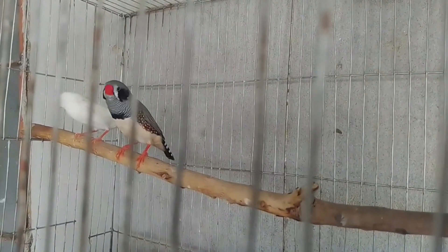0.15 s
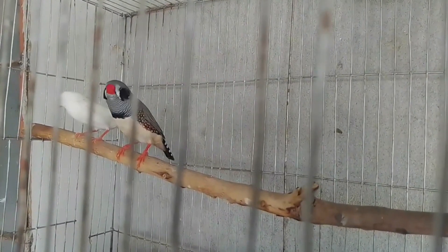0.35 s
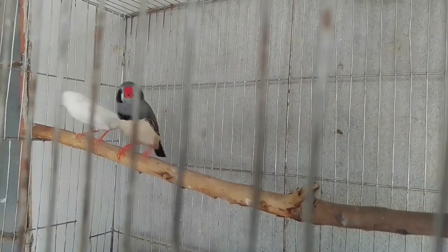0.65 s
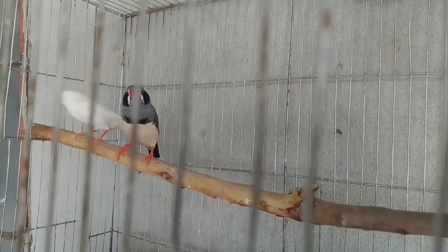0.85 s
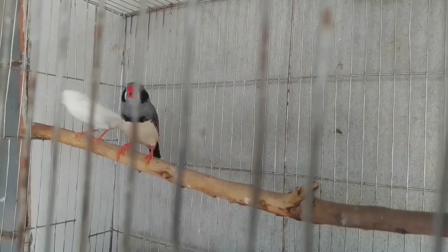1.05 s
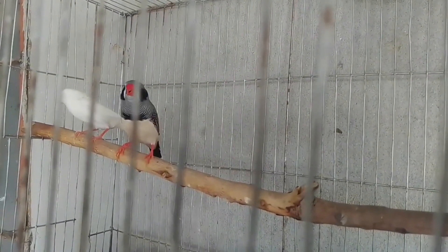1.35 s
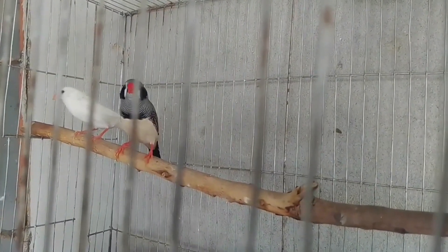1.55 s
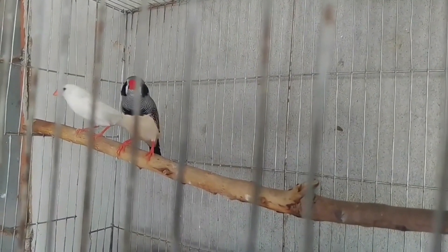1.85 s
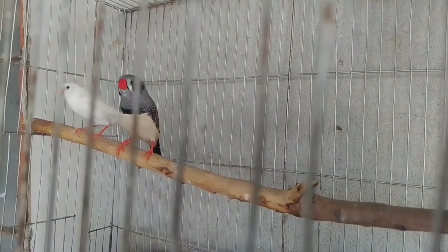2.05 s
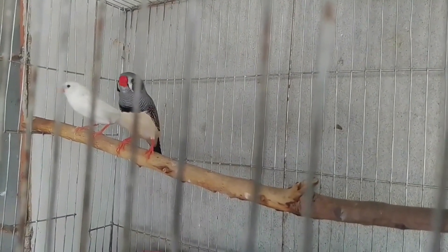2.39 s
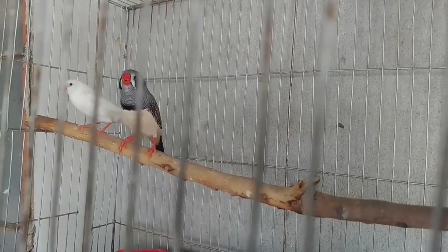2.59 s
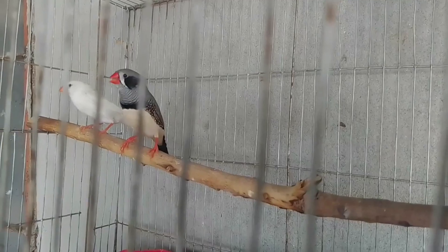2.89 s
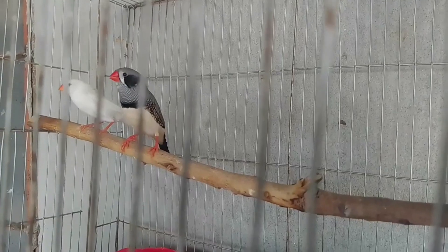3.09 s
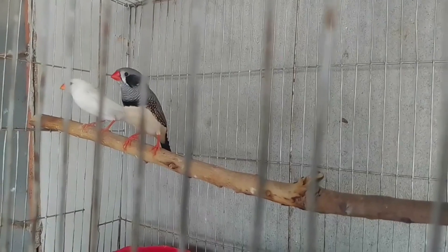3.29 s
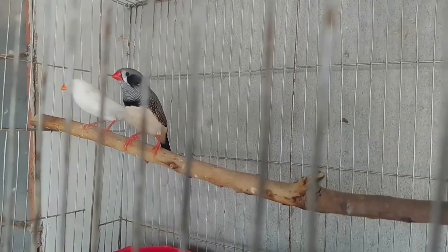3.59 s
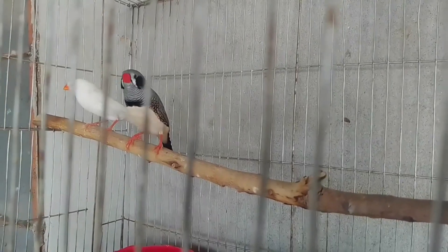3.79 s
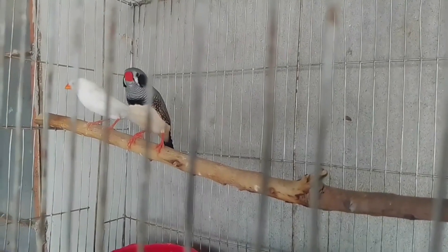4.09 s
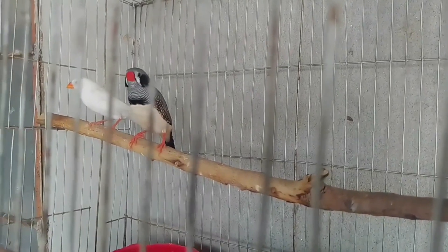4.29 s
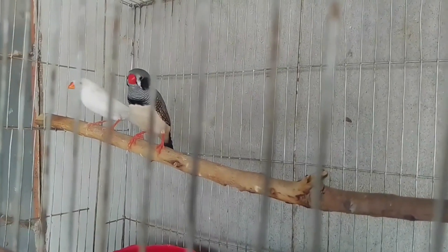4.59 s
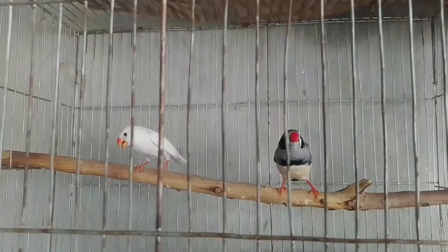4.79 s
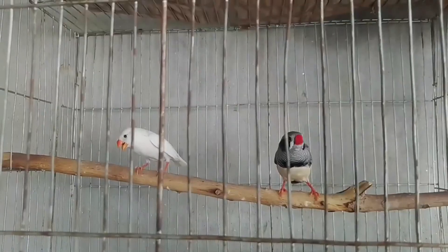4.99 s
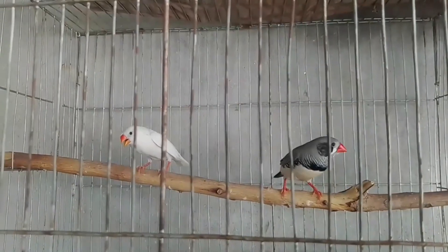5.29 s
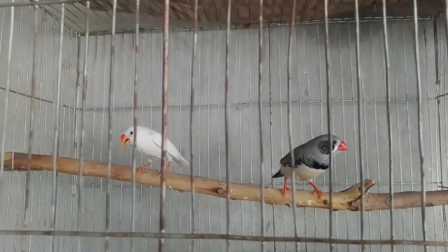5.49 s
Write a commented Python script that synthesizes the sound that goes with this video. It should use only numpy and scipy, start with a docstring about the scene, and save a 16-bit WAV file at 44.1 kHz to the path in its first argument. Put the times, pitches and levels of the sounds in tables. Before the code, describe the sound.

A male finch sings close by in an indoor cage, over a soft room murmur and hiss with slight echo. His quick, high, raspy phrase lasts under half a second and comes five times, at about 0, 0.8, 1.5, 2.2 and 3 seconds. Short calls fall at 0.7 and 2.2 seconds, and longer, louder nasal ones at 1.3 and 2.8. Another small bird warbles briefly around 0.7 and 2.1 seconds. Short wing rustles come at about 1.6, 2.4, 2.6 and 3 seconds. The song ends near 3.4 seconds, and faint distant birds call around 4 seconds, followed by more light rustling near 4.6. At about 4.75 seconds the sound cuts out for an instant, returning at 4.9 with louder, fuller room noise. The other bird gives a quick run of raspy chirps from 5.1 to 5.3 seconds.

```python
"""Zebra finch in a cage

A male sings his motif five times indoors, with calls between: syrinx harmonics coloured by throat,
beak and microphone. Another small bird warbles, wings rustle and far birds call over the room's
murmur. The sound drops out once and comes back with a louder room."""
import sys
import numpy as np
from scipy import signal
from scipy.fft import rfft, irfft, next_fast_len
from scipy.io import wavfile
from scipy.ndimage import uniform_filter1d, map_coordinates

SR = 44100
rng = np.random.default_rng(int(sys.argv[2]) if len(sys.argv) > 2 else 0)


def store_wav(level_fs):
    """Save 16-bit WAV to argv[1]."""
    pcm = np.round(np.clip(np.atleast_2d(level_fs), -1, 1) * 32767)
    wavfile.write(sys.argv[1], SR, pcm.T.astype(np.int16))


N = 249165
TOP_HZ = 15750
DROPOUT_START_S, DROPOUT_END_S = 4.7425, 4.9105


def amp(db):
    """Gain of a dB value."""
    return 10 ** (np.asarray(db) / 20)


def unit_rms(x):
    """x scaled to rms 1."""
    return x / np.sqrt(np.mean(np.abs(x) ** 2) + 1e-20)


def curve_at(points, hz):
    """Interpolates (Hz, value) points on a log frequency axis."""
    point_hz, values = np.transpose(points)
    return np.interp(np.log(hz + 1), np.log(point_hz + 1), values)


def wobble(n, rate_hz):
    """Smooth random curve of n samples, rate_hz knots a second."""
    knots = rng.standard_normal(int(n / SR * 2000) + 4)
    return map_coordinates(knots, [np.arange(n) * min(rate_hz, 2000) / SR])


def blur(n, rate_hz):
    """Complex wobble; spreads a tone into a noise band."""
    return wobble(n, rate_hz) + 1j * wobble(n, rate_hz)


def filtered(x, response):
    """x through a gain given as a function of Hz."""
    size = next_fast_len(len(x) + 8192)
    return irfft(rfft(x, size) * response(np.fft.rfftfreq(size, 1 / SR)), size)[:len(x)]


def patchy_noise(spectrum, patchy_db):
    """Coloured noise of rms 1 with patches of random gain in time and frequency."""
    bins = signal.stft(rng.standard_normal(N), nperseg=512)[2]
    patches = uniform_filter1d(uniform_filter1d(rng.standard_normal(bins.shape), 6, 0), 10, 1)
    noise = signal.istft(bins * amp(patchy_db * unit_rms(patches)), nperseg=512)[1][:N]
    return unit_rms(filtered(noise, lambda hz: amp(curve_at(spectrum, hz))))


def add(track, start_s, sound):
    """Mixes sound into track at start_s."""
    part = track[round(start_s * SR):][:len(sound)]
    part += sound[:len(part)]


# Room noise before the dropout. Each row: time in seconds, murmur and hiss in relative dB.
ROOM_LEVELS = [(0, -53, -58.5), (1.3, -51.5, -47.5), (2.1, -54.5, -54.5), (2.8, -49, -54),
               (3.5, -52.5, -57.5), (4.7, -51, -58.5)]
# Room noise spectra. Each row: frequency in Hz, relative density in dB.
MURMUR_SPECTRUM = [(28, -70.5), (62, -11.5), (270, -1), (500, -7), (1700, -13), (2700, -10), (4000, -22.5),
                   (16000, -66)]
HISS_SPECTRUM = [(2000, -12), (5000, -11), (7500, -11.5), (9600, -3.5), (11500, -13.5), (16000, -29)]
LOUD_ROOM_SPECTRUM = [(30, -34), (109, 0), (190, -12.5), (335, -3), (500, -12), (1300, -8), (3270, -9),
                      (5130, -15), (7400, -13), (9500, -4.5), (12000, -22), (16000, -35)]


def room_noise():
    """Murmur and hiss; after the dropout the noise surges and settles, louder and fuller."""
    t = np.arange(N) / SR
    times_s, murmur_db, hiss_db = np.transpose(ROOM_LEVELS)
    murmur = amp(np.interp(t, times_s, murmur_db) - 2.3) * patchy_noise(MURMUR_SPECTRUM, patchy_db=1.5)
    hiss = amp(np.interp(t, times_s, hiss_db) + 2.5) * patchy_noise(HISS_SPECTRUM, patchy_db=2)
    surge_db = 5 * np.exp(-np.abs(t - DROPOUT_END_S) / 0.0193)
    loud_room = amp(-41.5 + surge_db) * patchy_noise(LOUD_ROOM_SPECTRUM, patchy_db=1.1)
    return np.where(t < DROPOUT_END_S, murmur + hiss, loud_room)


# Voice colour: throat and microphone together, with a bright peak near 9.6 kHz.
# Each row: frequency in Hz, gain in dB.
VOICE_COLOUR = [(950, -27.5), (1450, -15.5), (2100, -18.5), (2750, 2), (3600, -1), (5700, 1), (6400, -9),
                (7300, -10), (9600, -3.5), (11500, -22), (13500, -30.5), (16000, -42)]


def syllable(gesture, pitch_ratio, beak_path_hz, treble_db, throb_db, beak_db, tilt_db_per_khz=0,
             strong_every=1, strong_shift=0, weak_db=0, shut_db=0, hiss=0.058):
    """Syrinx harmonics with voice colour and a moving beak resonance; roughness blurs each to noise."""
    times_s, *columns = np.transpose(gesture)
    length_s = times_s[-1]
    t = np.arange(times_s[0], length_s, 1 / SR)
    n = len(t)
    pitch_hz, db, roughness = [np.interp(t, times_s, column) for column in columns]
    pitch_hz = pitch_hz * pitch_ratio * (1 + 0.0046 * wobble(n, 125.4))
    harmonics = np.arange(1, 31)[:, None]
    hz = harmonics * pitch_hz
    weak = (harmonics + strong_shift) % strong_every > 0

    beak_hz = np.interp(t, np.linspace(0, length_s, len(beak_path_hz)), beak_path_hz)
    shape_db = curve_at(VOICE_COLOUR, hz) + beak_db / (1 + ((hz - beak_hz) / 700) ** 2)
    shape_db += weak_db * weak
    # A closed beak narrows the sound around its lowest resonance; opening lets the upper partials in.
    shape_db += tilt_db_per_khz * np.minimum(np.abs(hz / 1000 - 2.7), 3.5)
    shape_db += shut_db * np.exp(-(t / 0.013) ** 2) * np.clip((hz - 4300) / 1400, 0, 1)
    gain = amp(shape_db) * (hz < TOP_HZ)
    gain /= np.sqrt(np.sum(gain ** 2 * (hz < 7000), 0) / 2)
    lift_db = treble_db + 0.7 * (-25 - db)  # the treble holds up as the level falls
    gain *= amp(lift_db * np.clip((hz - 6500) / 1000, 0, 1))

    # Uneven cycles blur the high partials first; weak partials are raspier.
    noise_share = roughness * (1 + (hz / 6000) ** 2) + hiss * (hz > 6800)
    noise_share = np.clip(noise_share + 0.55 * weak, 0, 1)
    rasp = np.array([blur(n, 900) for _ in harmonics]) / np.sqrt(2)
    swell = amp(2.5 * np.array([wobble(n, 76) for _ in harmonics]))
    phase = 2 * np.pi * harmonics * np.cumsum(pitch_hz) / SR + 0.3 * harmonics ** 2
    partials = (np.sqrt(1 - noise_share) * swell + np.sqrt(noise_share) * rasp) * np.exp(1j * phase)
    fades = np.minimum(t / 0.003, 1) * np.minimum((length_s - t) / 0.01, 1)
    return fades * amp(db + throb_db * wobble(n, 250)) * np.sum(gain * partials.imag, 0)


# Syrinx gestures. Each row: time in seconds, base pitch in Hz, base level in dB, roughness 0-1.
OPENER_GESTURE = [(0, 1430, -56, 0.1), (.007, 1526, -32.5, .05), (.016, 1467, -31.5, .15),
                  (.021, 890, -34, .4), (.028, 910, -30, 0.2), (.04, 787, -33, 0.5),
                  (.052, 730, -28.5, 0.2), (.068, 688, -49.5, 0.4)]
SLIDE_GESTURE = [(0, 715, -38.5, .6), (.012, 674.6, -25, 0.32), (.018, 652, -24.5, .22),
                 (.03, 591, -34, 0.22), (.054, 564, -33.5, .45)]
WHISTLE_GESTURE = [(0, 840.6, -47, .04), (.005, 774, -19, 0.09), (.019, 797, -16, .05),
                   (.027, 789, -17.5, 0.036), (.044, 754, -32, 0.036)]
RASP_GESTURE = [(0, 951, -46, .25), (.008, 1022, -18.5, 0.258), (.014, 1328, -26, .7),
                (.03, 1170, -19.5, 0.36), (.042, 916, -28.5, .7), (.082, 598, -45, 0.95)]
STACK_GESTURE = [(0, 568, -32, .5), (.01, 557, -41.5, .35), (.02, 555, -28.5, 0.05),
                 (.064, 540.7, -28.5, 0.021), (.076, 533, -26.5, .3), (.096, 553, -60, 0.45)]
# Motifs. Each row: start in seconds, spacing ratio, slide/rasp/stack gain in dB, slide/rasp pitch
# ratio, opener gain in dB and pitch ratio, whistle gain in dB and pitch ratio, stack pitch ratio,
# low pip's first and last pitch in Hz.
FINCH_MOTIFS = [(.005, .995, -0.55, 0.97, 2, 0.96, -4, 1.03, .988, 4650, 3800),
                (.759, 1.047, 0.4, 0.96, 0.3, 0.96, 2.5, 1, .994, 2530, 3360),
                (1.512, 1.001, 0.65, 0.95, 3.5, 0.97, 1.5, 1.022, 1.0001, 4400, 4100),
                (2.248, 1.05, 0.1, 0.96, -1.4, 1, -1.5, .99, 1.003, 2750, 3460),
                (3.016, 1.01, -1.1, 0.95, 4, 1, 0.2, 1.01, .992, 4560, 4166)]


def finch_motifs():
    """Each motif strings five syllables at its own tempo, strength and pitch."""
    out = np.zeros(N)
    for (start_s, spacing, db, ratio, opener_db, opener_ratio,
         whistle_db, whistle_ratio, stack_ratio, _, _) in FINCH_MOTIFS:
        opener = syllable(OPENER_GESTURE, opener_ratio, (3100, 4200, 3100), treble_db=-0.5,
                          throb_db=2.3, beak_db=-0.5, tilt_db_per_khz=-1.18, shut_db=-5)
        slide = syllable(SLIDE_GESTURE, ratio, (5000, 4600, 3250), treble_db=1.5, throb_db=1.3,
                         beak_db=-4, tilt_db_per_khz=-0.7, strong_every=2, strong_shift=1, weak_db=-14)
        whistle = syllable(WHISTLE_GESTURE, whistle_ratio, (6100, 6280, 6300), treble_db=10,
                           throb_db=1.9, beak_db=18.5, strong_every=4, weak_db=-18, hiss=0.37)
        rasp = syllable(RASP_GESTURE, ratio, (4400, 4600, 4000), treble_db=4.5,
                        throb_db=-1.2, beak_db=8, tilt_db_per_khz=0.5)
        stack = syllable(STACK_GESTURE, stack_ratio, (3500, 3100, 2900), treble_db=9,
                         throb_db=0.6, beak_db=5, tilt_db_per_khz=-6)
        add(out, start_s, amp(opener_db) * opener)
        add(out, start_s + spacing * 0.13, amp(db) * slide)
        add(out, start_s + spacing * 0.1993, amp(whistle_db) * whistle)
        add(out, start_s + spacing * 0.243, amp(db) * rasp)
        add(out, start_s + spacing * 0.311, amp(db) * stack)
    return out


def chirp(length_s, from_hz, to_hz, db):
    """A throbbing, raspy glide; its overtones are strongest near the treble resonance."""
    progress = np.arange(0, 1, 1 / (length_s * SR))
    n = len(progress)
    hz = (from_hz + (to_hz - from_hz) * progress) * (1 + 0.008 * wobble(n, 250))
    phase = 2 * np.pi * np.cumsum(hz) / SR
    throb_db = 2.4 * wobble(n, 300)
    tone = (1 + 0.32 * blur(n, 1100)) * np.exp(1j * phase)
    for k in (2, 3, 4):
        overtone_db = -24.5 + 11.8 * np.exp(-((k * hz - 9400) / 1200) ** 2) - 12 * (k * hz > 11000)
        tone += amp(overtone_db) * (0.2 + 1.2 * blur(n, 1100)) * np.exp(1j * k * phase)
    return amp(db + throb_db) * np.sqrt(2 * np.sin(np.pi * progress)) * tone.imag


def finch_pips():
    """A low and a high pip before each motif's slide."""
    out = np.zeros(N)
    for start_s, spacing, db, *_, from_hz, to_hz in FINCH_MOTIFS:
        add(out, start_s + spacing * 0.111, chirp(0.006, from_hz, to_hz, db - 31))
        add(out, start_s + spacing * 0.116, chirp(0.008, 5890, 5550, db - 32))
    return out


# Short notes. Each row: start and length in seconds, first and last pitch in Hz, level in dB.
RASPY_NOTES = [(0.61, .017, 2225, 2660, -39), (0.668, .02, 1880, 1875, -40),
               (0.699, 0.022, 3086, 2700, -31.5), (0.718, 0.021, 2736, 2856, -30),
               (0.745, 0.017, 2327, 2356, -30), (0.765, 0.019, 1900, 1986, -37),
               (1.61, 0.017, 4600, 4900, -39), (1.98, 0.044, 2620, 2332, -41),
               (2.032, 0.028, 3550, 3730, -45), (2.053, 0.023, 2345, 1955, -35),
               (2.082, 0.0415, 2950, 2890, -30.5), (2.119, 0.03, 2490, 2333, -30),
               (2.147, 0.034, 2133, 1876, -33.5), (5.104, 0.021, 2400, 2690, -43),
               (5.128, 0.0093, 3950, 3300, -33), (5.134, 0.04, 3210, 3350, -34.5),
               (5.184, 0.0058, 3900, 3440, -24.5), (5.187, 0.023, 3040, 2680, -26.5),
               (5.202, 0.017, 2764, 3340, -24), (5.219, 0.057, 3350, 3270, -35),
               (5.221, 0.025, 2513, 2630, -24.5), (5.249, 0.056, 2164, 2026, -41.5)]


def raspy_notes():
    """Short raspy notes: the other bird's runs, one lone high finch pip, and a low finch note that sounds with
    the first short call."""
    out = np.zeros(N)
    for start_s, *note in RASPY_NOTES:
        add(out, start_s, chirp(*note))
    return out


# Call gestures. Each row: time in seconds, base pitch in Hz, base level in dB, roughness 0-1.
SHORT_CALL_GESTURE = [(0, 738, -42, .2), (.007, 735, -26, .1), (.017, 635, -31.5, .15),
                      (.036, 586, -33, .3)]
LONG_CALL_GESTURE = [(0, 2021, -32, .1), (.006, 1893, -21.5, 0.27), (.013, 1617, -13.5, 0.12),
                     (.021, 1330, -25.5, .3), (.025, 1077, -16.5, 0.65), (.036, 890, -17.5, 0.07),
                     (.047, 920.5, -17, .03), (.07, 910, -17, 0.014), (.092, 926, -19, .03),
                     (.11, 967, -23.5, .04), (.135, 847.5, -15.5, 0.037), (.158, 820, -18.5, .2),
                     (.174, 740, -19, 0.62), (.195, 663, -45, 0.51)]
# Calls. Each row: start in seconds, gain in dB, pitch ratio.
SHORT_CALLS = [(0.661, -1, .995), (2.155, -4, 0.78)]
LONG_CALLS = [(1.268, -2.1, .995), (2.775, -1.63, 1.02)]


def finch_calls():
    """Falling calls between motifs; the long ones start with a shut beak."""
    out = np.zeros(N)
    for start_s, db, ratio in SHORT_CALLS:
        call = syllable(SHORT_CALL_GESTURE, ratio, (2900, 2800),
                        treble_db=1.5, throb_db=0.9, beak_db=6, tilt_db_per_khz=-3)
        add(out, start_s, amp(db) * call)
    for start_s, db, ratio in LONG_CALLS:
        call = syllable(LONG_CALL_GESTURE, ratio, (3500, 3430, 4900, 4387, 4020, 4200, 3400),
                        treble_db=6.5, throb_db=0.9, beak_db=8, shut_db=-29.5, hiss=0.07)
        add(out, start_s, amp(db) * call)
    return out


# Rustle spectrum as heard through the microphone. Each row: frequency in Hz, relative density in dB.
RUSTLE_SPECTRUM = [(900, -50.5), (2600, -17.5), (3300, -13), (5600, -6), (7300, -21), (9600, -6),
                   (12000, -24), (16000, -34.5)]
# Rustles. Each row: peak time and rise in seconds, level in dB, treble gain in dB.
WING_RUSTLES = [(1.622, 0.018, -27, -5.5), (2.424, 0.0088, -30.5, 7), (2.62, 0.012, -20, 5),
                (3.002, 0.016, -30, 1), (3.044, 0.014, -27, 0), (3.7, 0.031, -56, 11),
                (4.452, .04, -68, 24.5), (4.535, 0.0028, -53, 21.5), (4.595, 0.024, -29, -1.5),
                (4.723, 0.038, -49, 14.5)]


def wing_rustles():
    """Feathers brush air and wire: spiky noise under a quick swell."""
    t = np.arange(N) / SR
    spiky = patchy_noise(RUSTLE_SPECTRUM, patchy_db=4) * amp(0.83 * wobble(N, 700))
    treble = filtered(spiky, lambda hz: hz > 7300)
    out = np.zeros(N)
    for peak_s, rise_s, db, treble_db in WING_RUSTLES:
        rise = np.exp(-((t - peak_s) / rise_s) ** 2)
        fall = np.exp(-np.maximum(t - peak_s, 0) / (1.54 * rise_s))
        out += amp(db) * np.where(t < peak_s, rise, fall) * (spiky + (amp(treble_db) - 1) * treble)
    return out


# Far calls. Each row: start in seconds, centre and width in Hz, level in dB.
FAR_CALLS = [(3.885, 4660, 600, -50.5), (3.964, 4400, 500, -56), (4.016, 3050, 400, -52),
             (4.147, 3700, 1120, -46.5)]


def far_birds(rise_s=0.0061, hold_s=0.0084, decay_db_per_s=180):
    """Calls from other cages, smeared by the room into soft noise bands."""
    t = np.arange(SR // 4) / SR
    envelope = np.minimum(t / rise_s, 1) * amp(-decay_db_per_s * np.maximum(t - hold_s, 0))
    out = np.zeros(N)
    for start_s, centre_hz, width_hz, db in FAR_CALLS:
        noise = rng.standard_normal(len(t))
        band = filtered(noise, lambda hz: np.exp(-0.5 * ((hz - centre_hz) / width_hz) ** 2))
        add(out, start_s, amp(db) * unit_rms(band) * envelope)
    return out


# Room decay. Each row: frequency in Hz, time to fall 60 dB in seconds.
WALL_T60 = [(1500, 0.23), (2800, 0.2), (4500, 0.14), (6400, 0.22), (12000, 0.1)]


def wall_reverb(x, delay_s=0.0036):
    """Each frequency dies at its own speed; a new tail per block stands for the bird turning."""
    out, block = np.zeros(N + SR), SR // 4
    for start in range(0, N, block):
        hz, t, bins = signal.stft(rng.standard_normal(SR // 2), SR, nperseg=256)
        decay = amp(-60 * t / curve_at(WALL_T60, hz)[:, None])
        tail = signal.istft(bins * decay, SR, nperseg=256)[1]
        tail /= np.linalg.norm(tail)
        add(out, start / SR + delay_s, signal.fftconvolve(x[start:start + block], tail))
    return out[:N]


def scene():
    """Near birds and their reverb, far birds and room noise, in mono."""
    song = finch_motifs() + finch_calls()
    small_sounds = raspy_notes() + finch_pips() + wing_rustles()
    reverb = wall_reverb(amp(-12.5) * song + amp(-6.5) * small_sounds)
    return (song + small_sounds + reverb + far_birds() + room_noise())[None]


def record(dry):
    """During the dropout the signal rests at a small wavering offset; nothing passes above TOP_HZ."""
    t = np.arange(N) / SR
    offset = amp(-36.2) * (1 + 0.074 * wobble(N, 82))
    interrupted = np.where((t > DROPOUT_START_S) & (t < DROPOUT_END_S), offset, dry[0])
    return filtered(interrupted, lambda hz: hz < TOP_HZ)[None]


dry = scene()
out = record(dry)
store_wav(out)
```